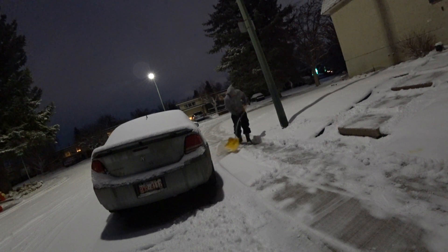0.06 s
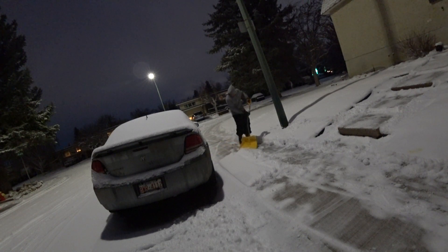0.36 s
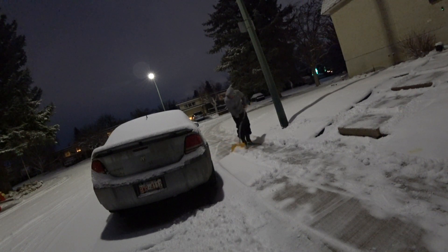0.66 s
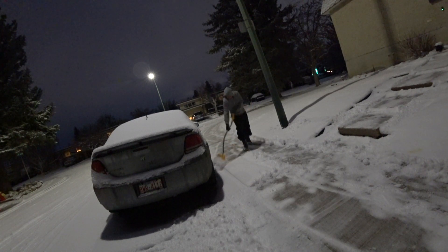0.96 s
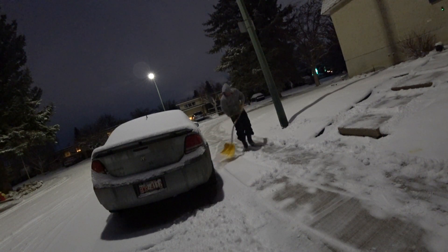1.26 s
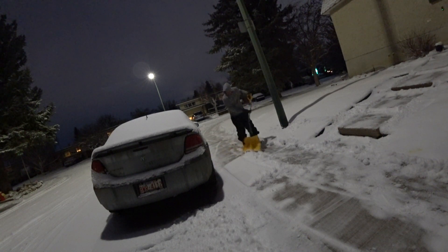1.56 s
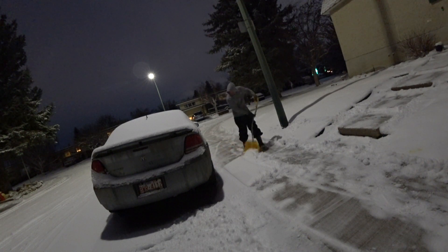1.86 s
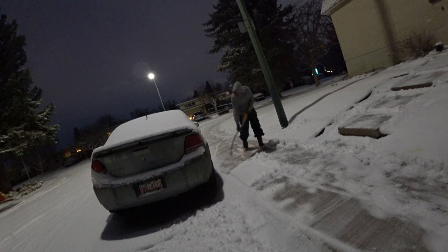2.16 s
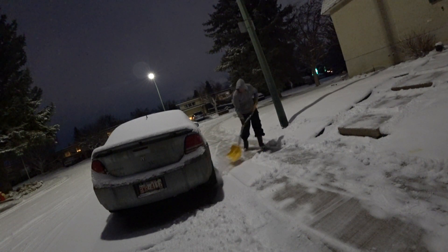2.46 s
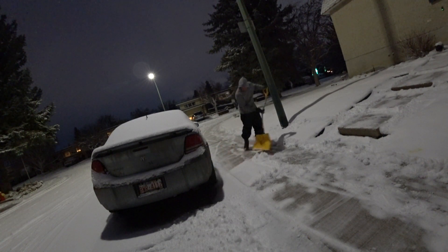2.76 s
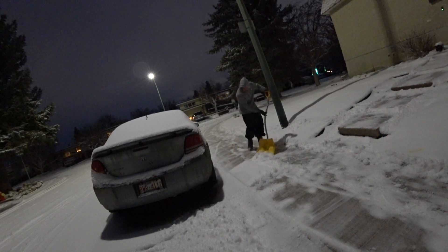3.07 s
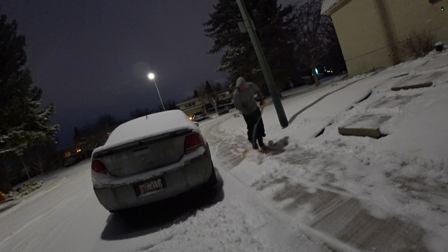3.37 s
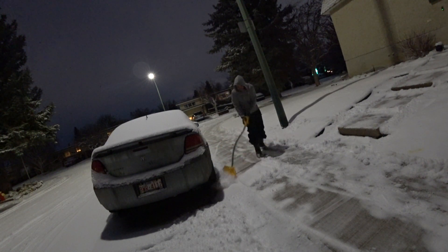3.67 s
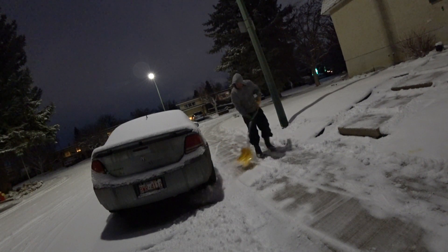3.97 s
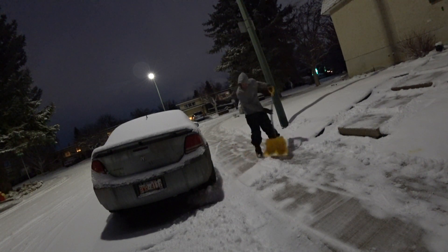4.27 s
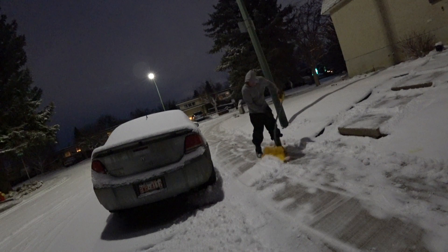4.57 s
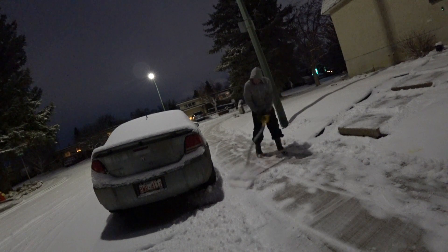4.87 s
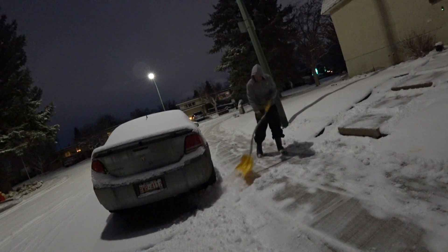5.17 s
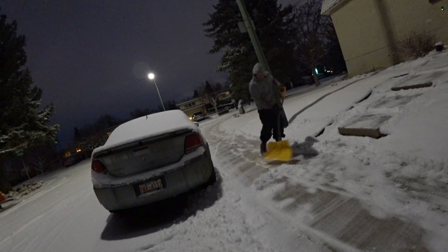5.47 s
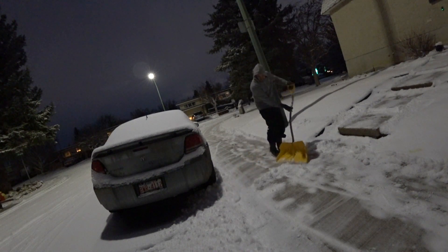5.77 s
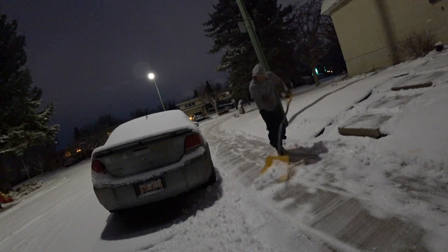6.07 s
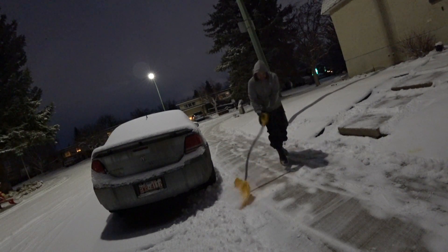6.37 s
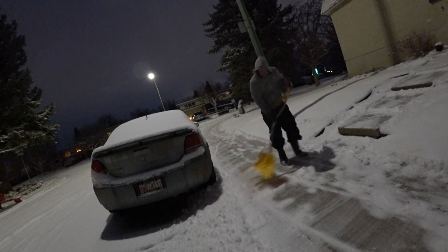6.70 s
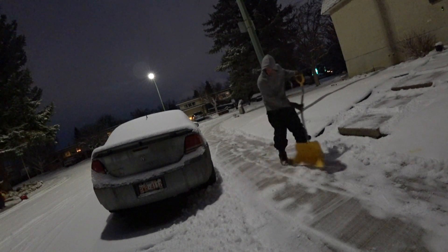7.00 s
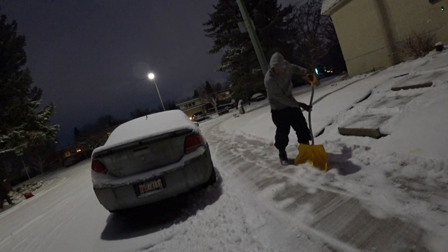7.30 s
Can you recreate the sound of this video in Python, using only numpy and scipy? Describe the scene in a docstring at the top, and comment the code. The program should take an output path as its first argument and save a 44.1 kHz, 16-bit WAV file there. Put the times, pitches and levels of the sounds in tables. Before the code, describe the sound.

Outdoors on a quiet night, someone clears a sidewalk near the microphone with a plastic shovel. Stroke after stroke, the blade lands with a knock, then scrapes roughly through snow with small snaps of ice and short squeaks. Tossed snow falls softly in the gaps. Another shovel pushes more quietly off to the left, while house walls give a faint echo and a distant town hums low.

```python
"""A plastic snow shovel knocks down on a paved sidewalk close to the microphones and is pushed across it,
stroke after stroke, on a quiet night. Its edge catches on grit and ice, the scoop judders and groans,
and loose snow hisses off the blade. A second shovel slides along off to the left;
a town rumbles far away and house walls answer faintly."""
import sys
import numpy as np
from scipy import signal
from scipy.fft import rfft, irfft, next_fast_len
from scipy.io import wavfile
from scipy.ndimage import uniform_filter1d, map_coordinates

SR = 44100
rng = np.random.default_rng(int(sys.argv[2]) if len(sys.argv) > 2 else 0)


def generate_wav(signal):
    """Clip the signal to [-1, 1] and save it as 16-bit WAV at the path in sys.argv[1]."""
    frames = np.transpose(np.atleast_2d(signal))
    scaled = np.clip(frames, -1, 1) * 32767
    pcm = np.round(scaled).astype(np.int16)
    wavfile.write(sys.argv[1], SR, pcm)


N = 323689
TIME = np.arange(N) / SR
SHORT = TIME[:SR // 4]
CONTACT_S = .0015  # a thin film of snow cushions the first contact

# how hard the edge bears on the pavement, one curve per stroke: t/s, pressure as grinding level/dB
PRESSURE = [
    [(0.376, -41.5), (0.485, -40), (0.544, -28.5), (0.66, -36.5), (0.68, -32.5), (0.774, -30.5),
     (0.82, -35), (0.9, -38.5), (0.92, -44.5), (0.97, -51)],
    [(1.755, -32.5), (1.845, -28.5), (1.915, -24.5), (1.929, -28), (2.081, -31), (2.125, -37.5),
     (2.195, -50)],
    [(3.005, -50.5), (3.055, -28), (3.083, -34.5), (3.163, -30.5), (3.273, -23.5), (3.359, -34.5),
     (3.372, -28.5), (3.46, -31.5), (3.561, -36.5), (3.579, -46.5), (3.65, -52.5)],
    [(4.39, -31), (4.432, -36), (4.47, -28.5), (4.52, -26), (4.658, -28.5), (4.774, -34), (4.855, -34.5),
     (4.93, -50)],
    [(5.745, -55), (5.772, -33.5), (5.819, -29), (5.833, -38), (5.885, -23.5), (5.935, -31.5), (5.975, -22),
     (6.04, -29), (6.115, -36.5), (6.145, -25.5), (6.19, -26.5), (6.24, -39.5), (6.33, -51)],
    [(7.11, -42), (7.16, -45), (7.204, -28.5), (7.235, -43), (7.265, -54), (7.33, -37), (7.45, -37)],
]
# spectra of the shaking scoop, grinding edge, snow crystals and breaking ice: f/Hz, level/dB
JUDDER_SPECTRUM = [(50, -33.5), (150, -11.5), (260, -8.5), (390, 0), (700, -1.5), (900, -5.5), (1300, -10),
                   (3000, -69.5)]
GRIND_SPECTRUM = [(400, -13), (850, 4.5), (1200, 4.5), (3000, 0), (4400, 0), (7000, -11.5), (11000, -66)]
HISS_SPECTRUM = [(2500, -34), (5800, 2), (7400, 5.5), (8800, 2), (10200, 3.5)]
SNAP_SPECTRUM = [(100, -23), (500, -2), (2000, -5.5), (11000, -9)]


def amp(db):
    """Decibels to gain."""
    return 10 ** (np.asarray(db) / 20)


def unit(x):
    """x at rms 1."""
    return x / np.sqrt(np.mean(x ** 2) + 1e-20)


def peaked(x):
    """x at peak 1."""
    return x / np.abs(x).max()


def fade(t, t60):
    """Exponential decay, 60 dB down at t60."""
    return np.exp(-np.log(1000) * t / t60)


def along(points, hz):
    """Points (f/Hz, value) read on a log frequency axis."""
    f, v = np.transpose(points)
    return np.interp(np.log(hz + 1), np.log(f + 1), v)


def add(track, s, sound):
    """Mix a sound in at time s."""
    part = track[..., round(s * SR):][..., :sound.shape[-1]]
    part += sound[..., :part.shape[-1]]


def filtered(x, response):
    """x through a frequency response."""
    n = x.shape[-1]
    m = next_fast_len(n + SR // 4)
    return irfft(rfft(x, m) * response(np.fft.rfftfreq(m, 1 / SR)), m)[..., :n]


def coloured(x, spectrum, size=2048):
    """x through a minimum-phase filter with the given spectrum."""
    cepstrum = irfft(np.log(amp(along(spectrum, np.fft.rfftfreq(size, 1 / SR)))))
    cepstrum[1:size // 2] *= 2
    cepstrum[size // 2 + 1:] = 0
    return signal.oaconvolve(x, irfft(np.exp(rfft(cepstrum))))[:len(x)]


def wobble(rate):
    """A random curve, rate knots a second."""
    return map_coordinates(rng.standard_normal(int(N * rate / SR) + 4), [TIME * rate], order=1)


def town():
    """Far traffic: a rumble alike at both microphones under a thin, wide hiss."""
    # traffic spectrum: f/Hz, level/dB
    spectrum = [(25, -8), (68, 1), (180, -9), (750, -18.5), (1300, -30.5), (6000, -40.5), (10500, -38)]
    # how alike left and right are, before the width is capped: f/Hz, likeness/-1..1
    likeness = [(120, 0.99), (570, 0.7), (1400, -1), (11000, 0.68)]

    def mid_and_side(hz):
        angle = np.arccos(np.clip(along(likeness, hz), -1, 1)) / 2
        width = np.tan(np.minimum(angle, 1))
        return amp(along(spectrum, hz)) * [np.ones_like(hz), width]

    mid, side = filtered(rng.standard_normal((2, N)), mid_and_side)
    return amp(-43) * np.array([mid + side, mid - side]) / mid.std()


def thumps():
    """Boots and packed snow give a soft push that dies within a cycle or two."""
    # dull thumps: t/s, peak level/dB, f/Hz
    thuds = [(0.0759, -18.5, 337), (1.667, -22, 129), (1.686, -20.5, 150), (4.378, -17, 298)]
    out = np.zeros(N)
    for s, db, hz in thuds:
        cycles = hz * SHORT
        add(out, s, amp(db) * peaked(np.sin(2 * np.pi * cycles) * cycles * fade(cycles, 2.55)))
    return out


def scoop(force, ring_db, flex_db):
    """A force heard directly and through the scoop's modes, whose strengths drift as the plastic flexes."""
    # modes of the plastic scoop: f/Hz, level/dB, t60/s
    modes = [(219, -7.5, 0.073), (336, -2, 0.03), (417.5, -2, 0.078), (499, -2.5, 0.18), (618, -9.5, 0.036),
             (792, -11, 0.11), (1334, -6, 0.059), (1690, -9, 0.018), (1895, -8, 0.039),
             (2350, -10.5, 0.015)]
    n, out = len(force), force.copy()
    knots = np.arange(0, n / SR + 1, .06)
    for hz, db, t60 in modes:
        pole = fade(1 / SR, t60) * np.exp(2j * np.pi * hz / SR)
        ring = signal.lfilter([1, 0, -1], [1, -2 * pole.real, abs(pole) ** 2], force) * (1 - abs(pole))
        flex = np.interp(TIME[:n], knots, rng.standard_normal(len(knots)))
        out += amp(ring_db + db + flex_db * flex) * ring
    return out


def clack():
    """One hard contact rings the blade's lip, a little differently each time."""
    # stiff modes of the lip: f/Hz, level/dB
    lip = [(1351, 6.5), (1803, -3), (2170, -0.5), (2700, -7), (4050, -7.5), (4720, -7.5)]
    hz, db = np.transpose(lip)[..., None]
    level, detune, phase = rng.standard_normal((3, len(lip), 1))
    modes = amp(db + 2 * level) * np.sin(2 * np.pi * hz * (1 + .015 * detune) * SHORT + np.pi * phase)
    return peaked(modes.sum(axis=0) * fade(SHORT, t60=0.025) * (1 - fade(SHORT, CONTACT_S)))


def blows():
    """The edge hits the pavement with a crack and chatters; the lip clacks and crumbs of snow scatter."""
    # the blade lands, touches or is stopped by a joint: t/s, knock/dB, crack/dB, clack/dB, chatter t60/s
    hits = [(0.077, -31, -44, -50, 0.14), (0.780, -18, -13.5, -21, 0.019), (1.6804, -15, -7.5, -15, 0.022),
            (1.686, -16, -20, -29, 0.22), (2.945, -23.5, -30.5, -48, 0.21), (3.041, -30, -21.5, -34, 0.093),
            (4.363, -10, -14.5, -24, 0.089), (4.374, -7.5, -15.5, -18.5, 0.099),
            (5.6657, -11.5, -18, -17, 0.14), (5.686, -14.5, -22, -24, 0.24),
            (7.0598, -16.5, -15, -25, 0.081), (7.066, -12, -20.5, -24, 0.13)]
    out = np.zeros(N)
    onset = 1 - fade(SHORT, CONTACT_S)
    for s, knock_db, crack_db, clack_db, chatter_t60 in hits:
        force = rng.standard_normal(len(SHORT)) * onset * fade(SHORT, chatter_t60)
        knock = peaked(coloured(scoop(force, ring_db=8, flex_db=1.5), JUDDER_SPECTRUM))
        clacks = amp(clack_db) * (clack() + clack())
        add(out, s, amp(knock_db) * knock + clacks + amp(crack_db) * crack(force))
    return out


def crack(force):
    """The bright part of a blow, trailed by a faint spray of snow crumbs."""
    # edge striking pavement: f/Hz, level/dB
    spectrum = [(300, -19), (1000, 9), (3300, -5), (11000, -15.5)]
    strike = coloured(scoop(force, ring_db=5, flex_db=2), spectrum)
    spray = coloured(rng.standard_normal(len(SHORT)) * fade(SHORT, t60=0.53), SNAP_SPECTRUM)
    return peaked(strike) + amp(-20) * peaked(spray)


def snaps():
    """Each bit of ice or grit breaks under the edge with a sharp crack and a short noisy tail."""
    # breaks: t/s, peak level/dB, left minus right/dB, t60/s
    breaks = [(0.3734, -25.5, 2, 0.062), (0.7795, -15, 1, 0.022), (0.7852, -10, 3, 0.023),
              (1.504, -20, 10, 0.016), (1.6664, -23.5, 14, 0.027), (1.6803, -14, 0, 0.0099),
              (1.7991, -9.5, 16.5, 0.017), (2.2262, -27, -0.5, 0.02), (2.948, -23.5, 3.5, 0.19),
              (3.367, -16, 11, 0.082), (3.529, -15.5, 0, 0.04), (3.735, -31.5, 2, 0.1),
              (4.623, -11.5, -2, 0.018), (4.8355, -17, 5, 0.088), (4.861, -15.5, -5, 0.017)]
    out = np.zeros((2, N))
    for s, db, pan_db, t60 in breaks:
        burst = rng.standard_normal(len(SHORT)) * (fade(SHORT, t60) + .1 * fade(SHORT, .1))
        low_cut_hz = 23 / t60  # short snaps are thin
        thin = signal.lfilter(*signal.butter(2, low_cut_hz, "high", fs=SR), burst)
        gains = amp(db + pan_db * np.array([[.5], [-.5]]))
        add(out, s, gains * peaked(coloured(thin, SNAP_SPECTRUM)))
    return out


def catches(rate, spread_db):
    """Random impulses of uneven size, rate a second, as an edge catches on grains."""
    size = amp(spread_db * np.clip(rng.standard_normal(N), -2, 2))
    return unit((rng.random(N) < rate / SR) * size * rng.choice([-1, 1], N))


def shifting(x, depth_db, size=1024):
    """Resonances come and go as the point of contact wanders along the edge."""
    spectra = signal.stft(x, nperseg=size)[2]
    drift = uniform_filter1d(rng.standard_normal(spectra.shape), size=3, axis=0)
    drift = unit(uniform_filter1d(drift, size=4, axis=1))
    return unit(signal.istft(spectra * amp(depth_db * drift), nperseg=size)[1][:N])


def stroke_gains():
    """Gains of boom, judder, grinding and hiss: all follow the pressure on the edge."""
    # each stroke at firm pressure: boom of the load/dB, judder of the scoop/dB, hiss of snow/dB
    strokes = [(-37, -30.5, -30.5), (-41.5, -28.5, -29.5), (-34.5, -27.5, -29), (-33.5, -26.5, -32),
               (-38.5, -25, -29.5), (-28.5, -29.5, -32)]
    firm_db = -29
    judder_growth, hiss_growth = 0.71, 0.53  # dB per dB of pressure
    lag_s, unload_s = 0.0064, 0.096  # the scoop shakes up a moment late and stills as it is lifted
    gather_s, settle_s = 0.011, 0.077  # snow starts to slide over the blade, and comes to rest
    packing_db_per_s = 10  # loose snow packs as the scoop fills
    gains = np.zeros((4, N))
    for curve, (boom_db, judder_db, hiss_db) in zip(PRESSURE, strokes):
        s, db = np.transpose(curve)
        age, remaining = TIME - s[0], s[-1] - TIME
        pressure = np.interp(TIME, s, db) - firm_db
        lagged = np.interp(TIME - lag_s, s, db) - firm_db
        shake = amp(judder_growth * lagged) * np.clip(remaining / unload_s, 0, 1)
        sliding = np.clip(np.minimum(age / gather_s, remaining / settle_s), 0, 1)
        hiss = sliding * amp(hiss_db + hiss_growth * pressure - packing_db_per_s * age)
        contact = (age > 0) & (remaining > 0)
        gains += contact * np.array([amp(boom_db) * shake, amp(judder_db) * shake,
                                     amp(firm_db + pressure), hiss])
    return uniform_filter1d(gains, size=200)


def scraping():
    """Coarse catches shake the scoop, finer ones grind at the edge, and snow crystals hiss."""
    # the scoop booming under its load of snow: f/Hz, level/dB
    boom_spectrum = [(60, -20.5), (220, -1), (330, 1), (450, -8), (700, -34)]
    coarse = catches(rate=900, spread_db=-0.5)
    judder = shifting(coloured(scoop(coarse, ring_db=4, flex_db=2), JUDDER_SPECTRUM), depth_db=1.8)
    fine = catches(rate=4500, spread_db=3) + .45 * coarse
    grind = shifting(coloured(scoop(fine, ring_db=-2, flex_db=3), GRIND_SPECTRUM), depth_db=1.9)
    crystals = catches(rate=15000, spread_db=5) + 0.22 * coarse
    hiss = shifting(coloured(crystals, HISS_SPECTRUM), depth_db=1.6)
    flutter = amp(1.15 * wobble(rate=110))  # the blade sticks and slips
    boom = unit(coloured(coarse, boom_spectrum))
    grain_ticks = amp(-12.5) * unit(coloured(catches(rate=28, spread_db=3), SNAP_SPECTRUM))
    boom_gain, judder_gain, grind_gain, hiss_gain = stroke_gains()
    shaking = boom_gain * boom + judder_gain * judder
    return flutter * (shaking + grind_gain * (grind + grain_ticks) + hiss_gain * hiss)


def tilted(x):
    """Each stroke takes its own colour from the tilt and load of the scoop."""
    # resonances lifted or muted, one list per stroke: f/Hz, gain/dB
    tilts = [
        [(260, -4), (930, -4), (2300, 2)],
        [(320, -2.5), (640, 5), (880, -4), (1320, 4), (2050, 2.5)],
        [(900, -3.5), (2080, 1.5)],
        [(270, -2), (1080, -1.5)],
        [(860, 3), (1200, -1), (1780, 1.5)],
        [(580, 3.5), (2750, -0.5)],
    ]
    margin_s, relative_width = .02, 0.11
    out = np.zeros(N)
    for curve, bumps in zip(PRESSURE, tilts):
        start, end = curve[0][0] - margin_s, curve[-1][0] + margin_s
        colour = lambda f: amp(sum(db * np.exp(-((f / hz - 1) / relative_width) ** 2)
                                   for hz, db in bumps))
        add(out, start, filtered(x[round(start * SR):round(end * SR)], colour))
    return out


def groans():
    """The blade sticks and slips: a short groan or squeak that wavers and sinks as the blade slows."""
    # stick-slip swells: crest t/s, level/dB, f/Hz, half-length/s
    swells = [(0.744, -28.5, 365, 0.052), (2.976, -23.5, 208, 0.021), (3.25, -25, 410, 0.055),
              (3.269, -22.5, 1202, 0.055), (3.306, -18.5, 409, 0.012), (4.439, -22.5, 403, 0.041),
              (4.597, -19.5, 365, 0.014), (4.6632, -22, 2400, 0.005), (5.704, -22.5, 403, 0.032),
              (5.972, -26.5, 660, 0.051), (6.788, -33.5, 481, 0.045)]
    sag_per_s = 1.12  # as a share of the pitch
    out = np.zeros(N)
    wavering_time = np.cumsum(1 + 0.0852 * wobble(rate=260)) / SR
    for s, db, hz, half_length in swells:
        span = slice(*np.searchsorted(TIME, [s - 2 * half_length, s + 2 * half_length]))
        t = TIME[span] - s
        swell = amp(db) * np.exp(-2 * (t / half_length) ** 2)
        out[span] += swell * np.sin(2 * np.pi * hz * (wavering_time[span] - sag_per_s * t ** 2 / 2))
    return out * amp(3.5 * wobble(rate=380))


def second_shovel():
    """A smoother, duller slide through the snow, off to one side."""
    # pushes: start t/s, end t/s, judder/dB, grinding/dB
    pushes = [(0.98, 1.686, -40, -44), (6.456, 6.65, -44.5, -54.5), (6.672, 7.065, -40.5, -50)]
    # spectra of its scoop and its sliding edge: f/Hz, level/dB
    body_spectrum = [(80, -28), (220, -4), (420, -6.5), (650, -2), (900, -14), (2000, -32.5)]
    edge_spectrum = [(500, -50), (1100, 9.5), (4700, 2.5), (11000, -12)]
    ramp_s, swell_db_per_s = 0.03, 4  # a push swells as snow piles up before the blade
    body = scoop(catches(rate=1500, spread_db=4), ring_db=0, flex_db=3)
    judder = unit(coloured(body, body_spectrum))
    grind = unit(coloured(catches(rate=9000, spread_db=2.5), edge_spectrum))
    out = np.zeros(N)
    for start, end, judder_db, grind_db in pushes:
        age = np.clip(TIME - start, 0, end - start)
        contact = np.interp(TIME, [start, start + ramp_s, end, end + ramp_s], [0, 1, 1, 0])
        out += contact * (amp(judder_db) * judder + amp(grind_db + swell_db_per_s * age) * grind)
    return out


def tosses():
    """Snow, flung aside or spilled off the blade, patters down as a soft swell of crystals and crumbs."""
    # falls of snow: crest t/s, level/dB
    falls = [(2.295, -50), (3.77, -49.5), (5.04, -48.5), (5.6, -56.5), (6.32, -48.5), (6.47, -49.5)]
    rise_s, fall_s = 0.11, 0.07
    swell = sum(amp(db) * np.exp(-((TIME - s) / np.where(TIME < s, rise_s, fall_s)) ** 2)
                for s, db in falls)
    crystals = unit(coloured(catches(rate=8400, spread_db=4.5), HISS_SPECTRUM))
    crumbs = unit(coloured(catches(rate=3000, spread_db=1.5), GRIND_SPECTRUM))
    return swell * (crystals + amp(-4.5) * crumbs)


def placed(x, place):
    """Mono to stereo: the recorder's body shades and delays the far microphone."""
    hz, db, lead = np.transpose(place)
    balance, phase = np.transpose([hz, db]), np.transpose([hz, lead])
    half = np.array([[.5], [-.5]])
    return filtered(x, lambda f: amp(half * along(balance, f)) * np.exp(1j * half * along(phase, f)))


def walls(x, t60, size=8192):
    """A diffuse answer from a car and the houses, thin in the bass, changing as the shovel moves."""
    out, window = np.zeros((2, N + size)), np.sin(np.pi * np.arange(size) / size)
    x = np.pad(x, (size // 2, size))
    for start in range(0, N + size // 2, size // 2):
        tail = rng.standard_normal((2, size)) * fade(TIME[:size], t60)
        tail = filtered(tail, lambda hz: hz / (hz + 400))
        piece = window * x[start:start + size]
        add(out, start / SR, signal.fftconvolve(piece[None], tail / np.linalg.norm(tail[0]), axes=1))
    return out[:, size // 2:][:, :N]


def scene():
    """From the sidewalk: one shovel close ahead, one to the left, walls around and the town far off."""
    # each shovel's place at the microphones: f/Hz, left minus right/dB, left lead/rad
    place_ahead = [(300, 0.3, -0.15), (1310, -4.5, -0.34), (6500, -0.3, 0.018), (10000, 0, -0.49)]
    place_left = [(150, 0.95, 0.35), (1100, 4.5, -0.66), (3600, 8.7, -0.59), (8000, 9.3, 1.4)]
    near = tilted(scraping()) + tosses() + groans() + blows() + thumps()
    other = second_shovel()
    ahead = placed(near, place_ahead)
    centre = ahead.mean(axis=0)
    # from 2.8 to 6.3 s the near shovel works its way right, so the left microphone is shaded more
    shade = np.interp(TIME, [2.8, 6.3], [0.85, 1.25])
    direct = centre + shade * (ahead - centre) + placed(other, place_left)
    echoes = walls(amp(-11.5) * near + amp(-5.5) * other, t60=0.21)
    return direct + echoes + snaps() + town()


def record(dry):
    """The recorder keeps nothing above its band limit."""
    top_hz = 11050
    return filtered(dry, lambda hz: 1 / np.sqrt(1 + (hz / top_hz) ** 300))


dry = scene()
out = record(dry)
generate_wav(out)
```